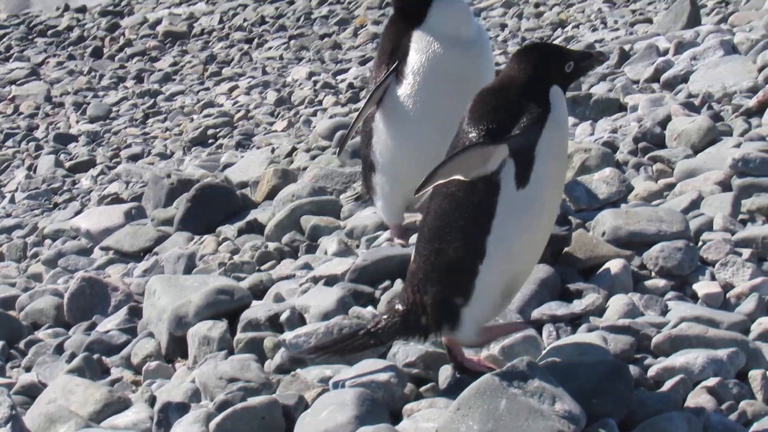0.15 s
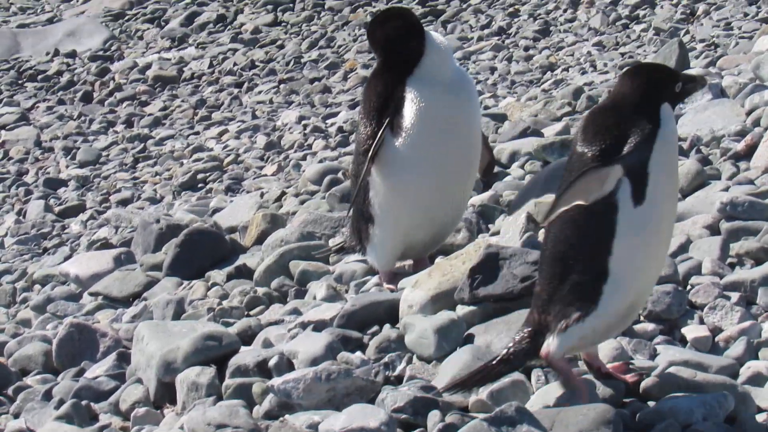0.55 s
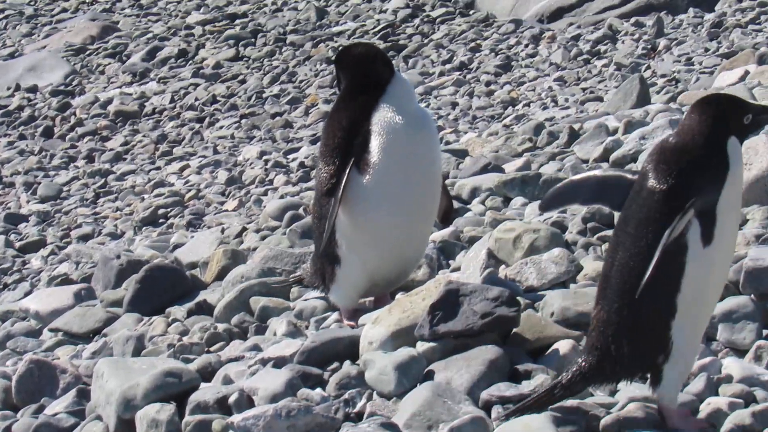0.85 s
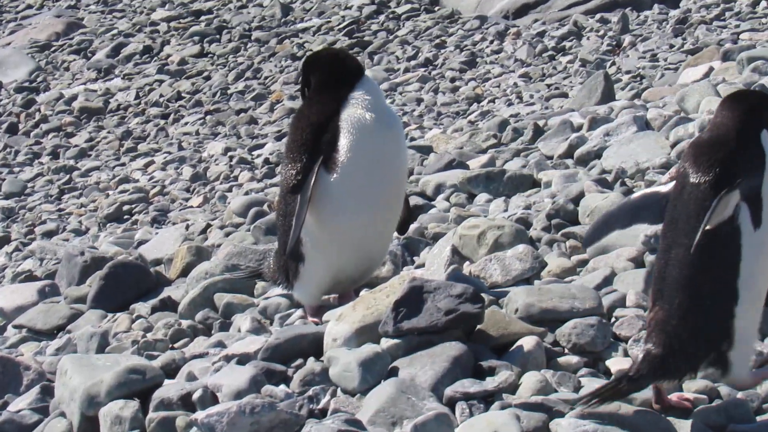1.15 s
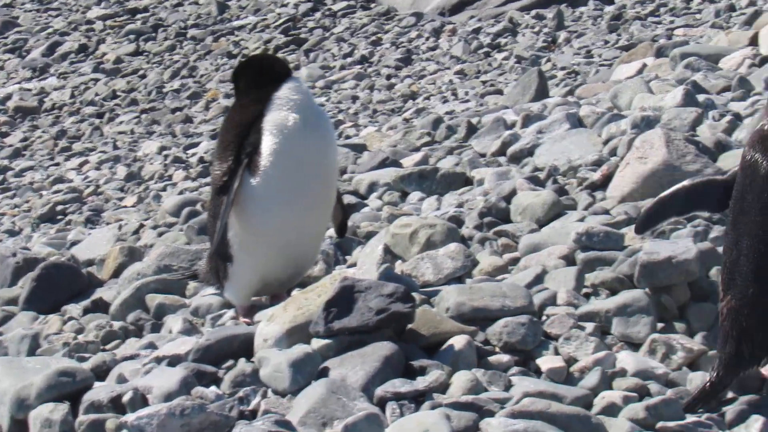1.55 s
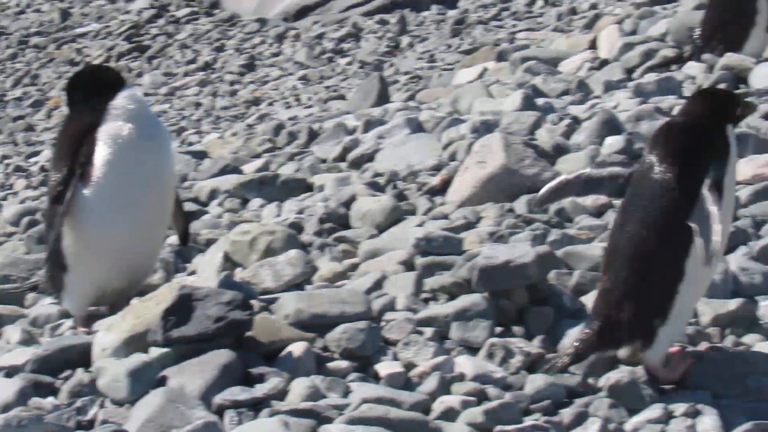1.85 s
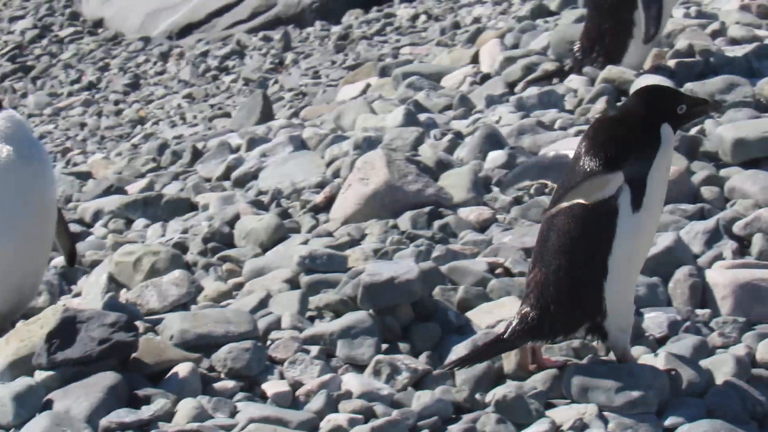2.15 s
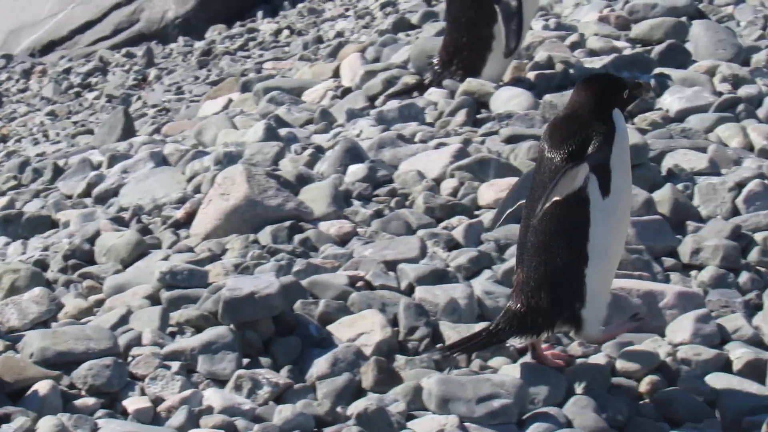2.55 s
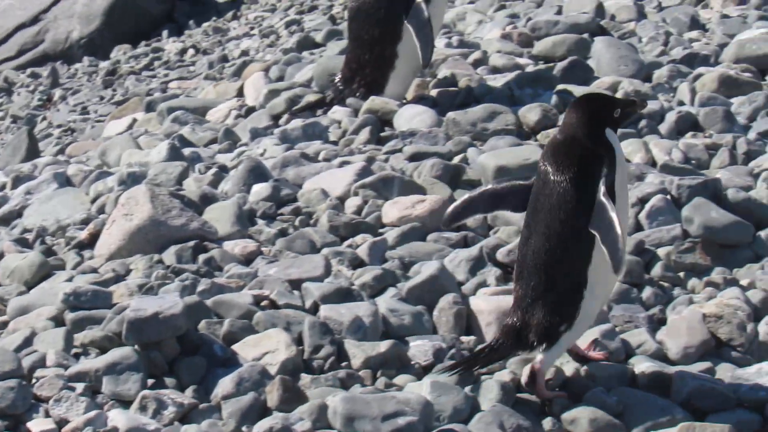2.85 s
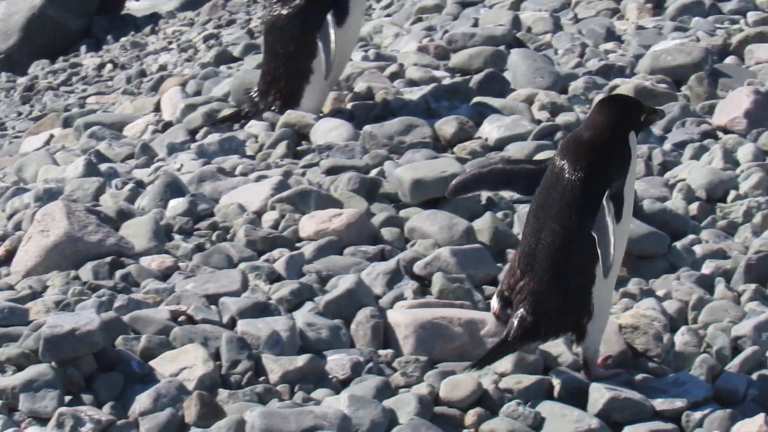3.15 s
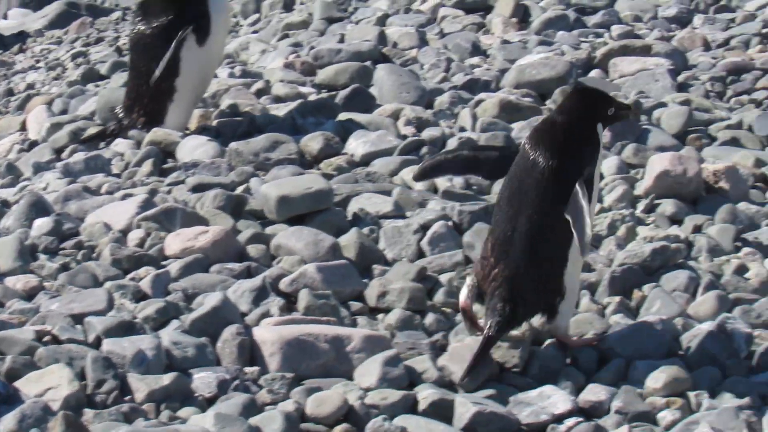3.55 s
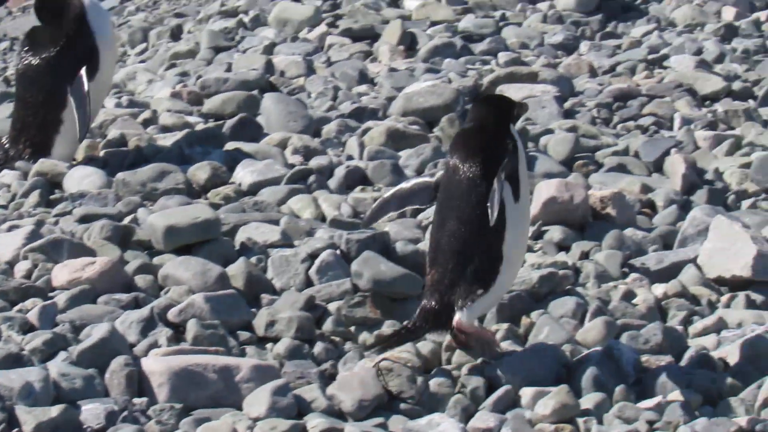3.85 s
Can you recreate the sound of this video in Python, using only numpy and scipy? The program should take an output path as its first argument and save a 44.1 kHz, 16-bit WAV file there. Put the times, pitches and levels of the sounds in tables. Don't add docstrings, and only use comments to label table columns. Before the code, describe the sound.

Gusty wind thumps and rumbles on a microphone at a stony shore, with a few pebble clicks

```python
import sys
import numpy as np
from scipy import signal
from scipy.io import wavfile
from scipy.ndimage import uniform_filter1d

SR = 44100
rng = np.random.default_rng(int(sys.argv[2]) if len(sys.argv) > 2 else 0)


def put_to_file(sound):
    columns = np.atleast_2d(sound).T
    safe = np.clip(columns, -1, 1)
    whole_steps = np.round(safe * 32767)
    wavfile.write(sys.argv[1], SR, whole_steps.astype(np.int16))


def convert_level_to_amplitude(level_db):
    exponent = np.asarray(level_db, float) / 20
    return 10 ** exponent


N = 176400


def lookup(table, x, log=False):
    a, b = np.array(table, float).T
    return np.interp(np.log(x), np.log(a), b) if log else np.interp(x, a, b)


def unit(x):
    return x / np.sqrt(np.mean(x ** 2))


def band(x, lo_hz, hi_hz, order=2):
    edges_hz = [lo_hz, min(hi_hz, .45 * SR)]
    return signal.sosfilt(signal.butter(order, edges_hz, "bandpass", fs=SR, output="sos"), x)


def walk(rate_hz):
    hold = int(SR / rate_hz)
    steps = np.repeat(rng.standard_normal(N // hold + 1), hold)
    return 1.65 * uniform_filter1d(uniform_filter1d(steps, hold), hold)[:N]


def add(out, at_s, x, lead=0):
    i = int(at_s * SR) - lead
    a, b = max(i, 0), min(i + x.shape[-1], N)
    out[:, a:b] += x[:, a - i:b - i]


# (f/Hz, peak level/dB, width/Hz)
ENGINE_TONES = [
    (75.0, -41.5, 5),
    (141.0, -41.5, 7),
]


def engine_hum():
    t = np.arange(N) / SR
    tone = 0
    for hz, db, width_hz in ENGINE_TONES:
        level = convert_level_to_amplitude(db + 2.2 * walk(width_hz))
        drift = np.cumsum(.25 * width_hz * walk(width_hz)) / SR
        tone = tone + level * np.sin(2 * np.pi * (hz * t + drift))
    return tone * np.array([[1], [.3]])


# (f/Hz, band level/dB)
SURF_SPECTRUM = [(60, -5.5), (200, -9.5), (500, -24.5), (720, -27.5), (1050, -26), (1700, -31.5),
                 (4500, -46), (11000, -53)]
# (f/Hz, side against mid level/dB)
SURF_WIDTH = [(100, 4.5), (700, -3.5), (1300, -5), (3000, -11), (6000, -3), (12000, 2.5)]


def surf():
    surf_db, swell_db, flicker_db = -44, .4, .9
    out, swell = 0, walk(2.87)
    for hz in 50 * 2 ** np.arange(0, 8.4, 1 / 3):
        db = lookup(SURF_SPECTRUM, hz, True) + swell_db * swell + flicker_db * walk(9)
        noise = band(rng.standard_normal((2, N)), hz * 2 ** (-1 / 6), hz * 2 ** (1 / 6))
        out = out + convert_level_to_amplitude(db) * noise * convert_level_to_amplitude([[0], [lookup(SURF_WIDTH, hz, True)]])
    return convert_level_to_amplitude(surf_db) * out / np.sqrt(np.mean(out[0] ** 2))


# (t/s, gain level/dB)
RECORDER_GAIN = [(0, -4), (.3, -4), (.65, 0.5), (.87, -0.5), (1.3, -5), (1.41, -6), (1.77, -7.5), (2.7, -2),
                 (2.96, -7.5), (2.98, -13.5), (3.4, -9.5), (4, -6)]


def gain_control():
    return convert_level_to_amplitude(lookup(RECORDER_GAIN, np.arange(N) / SR) + 3.5)


def decay(t, t60_s):
    return convert_level_to_amplitude(-60 * t / t60_s) * np.minimum(t / .0005, 1)


def pan(db):
    return convert_level_to_amplitude([[db / 2], [-db / 2]])


# (f ratio to centre, level/dB, t60/s)
STONE_MODES = [(.15, -3, .045), (.34, -8, .035), (.5, -9, .03), (.72, -4, .03), (1.0, 0, .028),
               (1.38, -6, .022), (2.1, -20, .014)]
# (t/s, peak level/dB, centre f/Hz, left-right level/dB)
PEBBLE_KNOCKS = [(0.191, -37.5, 1690, 5), (0.207, -44, 1730, 16), (0.3947, -31, 2560, 3),
                 (0.3975, -30, 2160, 9), (0.4213, -19, 2690, 4), (0.4266, -29, 2500, 17),
                 (0.435, -31, 2700, -4), (0.456, -24, 2820, 6), (0.459, -37, 3670, 0),
                 (0.491, -36.5, 1980, 7), (0.5145, -36, 2730, 5), (0.546, -43, 1820, 8),
                 (0.999, -42, 2020, 2), (1.0203, -32.5, 2100, 1), (1.1112, -34, 2550, 2),
                 (1.133, -28, 2460, 1), (1.2204, -43, 2630, 3), (1.255, -35, 1930, 1.0),
                 (1.5526, -41, 2070, 3), (1.578, -33.5, 2670, 0.5), (1.6008, -32, 2100, -1),
                 (1.6207, -42, 2460, 2), (1.6365, -29.5, 3050, 0.5), (1.6641, -43.5, 2730, -1),
                 (1.685, -38.5, 2870, 1), (1.708, -38.5, 2590, 1), (1.7614, -43, 2840, 3),
                 (2.937, -45, 2160, -8), (3.3644, -36, 1880, 1), (3.6192, -42.5, 1990, 3),
                 (3.686, -39.5, 2050, 2), (3.7665, -45, 2530, 4)]


def pebble_knocks():
    knock_db, scatter_db, strike = -2.5, 2, 7
    half_width, top_ratio = .06, 1.9
    out, t = np.zeros((2, N)), np.arange(2600) / SR
    for s, db, hz, pan_db in PEBBLE_KNOCKS:
        chance = rng.standard_normal((len(STONE_MODES), 2))
        grit = rng.standard_normal(len(t))
        grit[30] += strike
        ring = 0
        for (ratio, mode_db, t60_s), (a, b) in zip(STONE_MODES, chance):
            f = hz * ratio * (1 + .057 * b)
            mode = unit(band(grit, f * (1 - half_width), f * (1 + half_width), order=1))
            ring = ring + convert_level_to_amplitude(mode_db + scatter_db * a) * decay(t, t60_s) * mode
        ring = band(ring, 260, hz * top_ratio)
        add(out, s, convert_level_to_amplitude(db + knock_db) * ring / np.abs(ring).max() * pan(pan_db))
    return out


# (t/s, peak level/dB, centre f/Hz, left-right level/dB)
PEBBLE_TICKS = [(0.3335, -35.5, 9000, 4), (0.4913, -62, 7050, -17), (0.6225, -43.5, 10300, 3),
                (0.7263, -22.5, 11800, 1), (0.858, -37, 9200, 3), (0.995, -43, 10000, 1),
                (1.256, -30.5, 6640, 0), (1.378, -41.5, 11000, 2.5), (1.5596, -47, 9800, 1),
                (1.6117, -44, 11100, -2.5), (2.237, -44, 13300, -2), (2.418, -34, 11200, 6.5),
                (2.762, -48.5, 9500, 0), (3.0707, -49.5, 7900, 9), (3.6854, -61, 6000, 20)]


def pebble_ticks():
    tick_db, t60_s = -9.5, .0078
    out, t = np.zeros((2, N)), np.arange(2600) / SR
    for s, db, hz, pan_db in PEBBLE_TICKS:
        noise = rng.standard_normal((2, len(t))) + 1.5 * rng.standard_normal(len(t))
        crack = decay(t, t60_s) * unit(band(noise, hz * .62, hz * 1.3))
        add(out, s, convert_level_to_amplitude(db + tick_db) * crack * pan(pan_db))
    return out


COMMON_DB = -13.5
# (t/s, share: left +, right -)
WIND_LEAN = [(0, 0.13), (.4, 0.13), (.65, -0.13), (1.1, -0.12), (1.4, -0.14), (1.7, 0.24), (2.2, -0.036),
             (2.6, -.12), (3.1, -0.041), (4, 0.045)]


def eddies(rows, turns, wander, port=0):
    out, chance = np.zeros((2, N)), rng.standard_normal((len(rows), 5))
    for (s, db, hz), c in zip(rows, chance):
        half = int(2.5 * turns / hz * SR)
        u = np.arange(-half, half) / SR * hz
        shape = convert_level_to_amplitude(db) * np.exp(-(u / turns) ** 2)
        turn = 2 * np.pi * u * (1 + .05 * c[0] * u / turns)
        side = (port or np.sign(c[1])) * np.cos(turn + wander * c[2])
        mid_db = COMMON_DB + 3 - 6 * abs(port) + wander * .3 * c[0]
        mid = convert_level_to_amplitude(mid_db) * np.sign(c[3]) * np.cos(turn + (wander + .5) * c[4])
        add(out, s, shape * np.array([mid + lookup(WIND_LEAN, s) * side, side]), lead=half)
    return out


# (t/s, level/dB, flutter sharpness level/dB)
GUSTS = [(0, -15, 4), (.2, -31, -2), (.4, -35, -1), (.56, -43, -1), (.66, -31, -4), (.86, -16, 1),
         (1.0, -33, -2), (1.3, -26, -3), (1.57, -19, 1), (1.76, -45, -3), (1.9, -35, -5), (2.22, -42, -4),
         (2.45, -28, -5), (2.82, -14, 6), (2.97, -17, 3), (3.1, -29, -1), (3.4, -15, -1), (4, -18, -4)]


def small_eddies(large):
    per_s, small_db, scatter_db = 150, -1.5, 3
    wake_db, wake_db_per_s = -15, 350
    core_db, core_s = -9, .005
    small_hz, per_db, per_sharp_db, spread = 165, .018, .05, .5
    count = int(per_s * N / SR)
    chance = rng.standard_normal((count, 2))
    s = (np.arange(count) + rng.random(count)) / per_s
    at, level_db, sharp_db = np.array(GUSTS, float).T
    apart_s = np.abs(s[:, None] - large[:, 0])
    wake = large[:, 1] + wake_db - wake_db_per_s * apart_s
    gust_db = np.maximum(np.interp(s, at, level_db), wake.max(axis=1))
    gust_db = gust_db + core_db * (apart_s.min(axis=1) < core_s)
    bend = per_db * (gust_db + 15) + per_sharp_db * np.interp(s, at, sharp_db) + spread * chance[:, 0]
    hz = np.clip(small_hz * np.exp(bend), 30, 700)
    db = gust_db + small_db + scatter_db * chance[:, 1] - 2.6 * np.log2(hz / small_hz) ** 2
    return eddies(np.array([s, db, hz]).T, turns=.8, wander=9)


# (t/s, peak level/dB, turning f/Hz)
LEFT_EDDIES = [(0.007, -4, 170), (0.019, -10, 110), (0.181, -16, 140), (0.299, -24, 70), (0.723, -19, 340),
               (0.798, -7, 120), (0.855, -8, 190), (0.866, -12, 210), (0.877, -5.5, 210), (1.316, -9, 120),
               (1.398, -2.6, 180), (1.419, -13, 120), (1.5, -11, 290), (1.515, -11, 140), (1.568, -14, 140),
               (1.58, -10, 190), (1.594, -12, 250), (1.914, -17, 100), (2.546, -4, 120), (2.557, -13, 130),
               (2.616, -8, 140), (2.708, -10, 190), (2.741, -10, 250), (2.774, 0.6, 200), (2.786, -3, 250),
               (2.795, -10, 320), (2.804, -13, 170), (2.869, -5, 280), (2.878, -5, 210), (2.885, -9, 140),
               (2.894, -8, 240), (2.904, -8, 170), (2.929, -11, 210), (2.972, 1.3, 150), (2.98, -15, 380),
               (2.998, -14, 180), (3.148, -13, 220), (3.18, -12, 170), (3.331, -12, 130), (3.347, -8, 120),
               (3.409, -10, 230), (3.484, -10, 130), (3.593, -7, 140), (3.599, -16, 380), (3.606, -6, 140),
               (3.614, -19, 340), (3.655, -10, 120), (3.693, -9, 130), (3.768, -8, 190), (3.908, -10, 120),
               (3.917, -7, 130)]
# (t/s, peak level/dB, turning f/Hz)
RIGHT_EDDIES = [(0.015, -1, 220), (0.122, -11, 170), (0.127, -17, 80), (0.418, -23, 70), (0.595, -21, 110),
                (0.719, -8, 220), (0.807, -11, 140), (0.814, -5, 140), (0.847, -11, 120), (0.862, -15, 150),
                (0.875, -5.5, 250), (0.891, -3, 200), (1.091, -14, 120), (1.18, -18, 100),
                (1.192, -18, 100), (1.386, -14, 210), (1.493, -15, 130), (1.561, -6, 180), (1.587, -1, 130),
                (1.598, -7, 160), (1.854, -18, 90), (2.352, -12, 110), (2.388, -12, 220), (2.609, -12, 100),
                (2.736, -12, 180), (2.747, -18, 120), (2.779, -13, 140), (2.79, -2.5, 210), (2.81, -9, 190),
                (2.831, -11, 170), (2.854, -12, 230), (2.881, -19, 380), (2.923, -10, 220),
                (2.965, -10, 280), (2.986, -11, 290), (3.136, -14, 140), (3.145, -16, 380),
                (3.153, -9, 160), (3.185, -14, 200), (3.228, -15, 130), (3.248, -7, 210), (3.28, -11, 160),
                (3.341, -6, 140), (3.374, -7, 190), (3.382, -8, 150), (3.397, -5, 170), (3.417, -8, 200),
                (3.423, -12, 170), (3.448, -9, 120), (3.55, -10, 240), (3.623, -6, 160), (3.63, -4, 180),
                (3.639, -11, 190), (3.727, -8, 130), (3.746, -3, 130), (3.832, -10, 170), (3.87, -10, 180),
                (3.881, -9, 190)]


def wind():
    flutter_db, flutter_hz, heave_db, heave_hz = -28, 235, -29, 63.3
    skirt_db, cut_hz, low_hz = -59.5, 549, 30.5
    large = np.array(LEFT_EDDIES + RIGHT_EDDIES, float)
    air = small_eddies(large)
    large[:, 1] += .8 * (large[:, 1] > -1.5)
    left, right = np.split(large, [len(LEFT_EDDIES)])
    air = air + eddies(left, turns=.62, wander=.05, port=1)
    air = air + eddies(right, turns=.62, wander=.05, port=-1)

    push = uniform_filter1d(np.abs(air[1]), size=300)
    at, _, sharp_db = np.array(GUSTS, float).T
    sharp = push ** 1.49 * convert_level_to_amplitude(np.interp(np.arange(N) / SR, at, sharp_db))
    noise = rng.standard_normal((2, N)) * convert_level_to_amplitude([[COMMON_DB + 3.0], [0]])
    flutter = unit(band(noise, flutter_hz * .7, flutter_hz * 1.9, order=1))
    heave = unit(band(noise, heave_hz * .5, heave_hz * 1.695))
    skirt = unit(band(rng.standard_normal((2, N)), 540, 1060))
    air = air + convert_level_to_amplitude(flutter_db) * sharp * flutter * 10
    air = air + convert_level_to_amplitude(heave_db) * uniform_filter1d(push, size=900) * heave * 10
    air = signal.sosfiltfilt(signal.butter(6, cut_hz, fs=SR, output="sos"), air)
    air = signal.sosfiltfilt(signal.butter(1, low_hz, "highpass", fs=SR, output="sos"), air)
    return air + convert_level_to_amplitude(skirt_db) * sharp * skirt * 10


def scene():
    shore = (engine_hum() + surf()) * gain_control()
    mid, side = wind() + shore
    return np.array([mid + side, mid - side]) + pebble_knocks() + pebble_ticks()


def band_limit(x):
    return signal.sosfilt(signal.butter(12, 15040, fs=SR, output="sos"), x)


def record(dry):
    soft = signal.sosfilt(signal.butter(3, 12000, fs=SR, output="sos"), dry)
    soft = signal.lfilter(*signal.iirnotch(691, 5.2, fs=SR), soft)
    mix = np.clip(soft, -1, 1)
    return band_limit(mix)


dry = scene()
out = record(dry)
put_to_file(out)
```